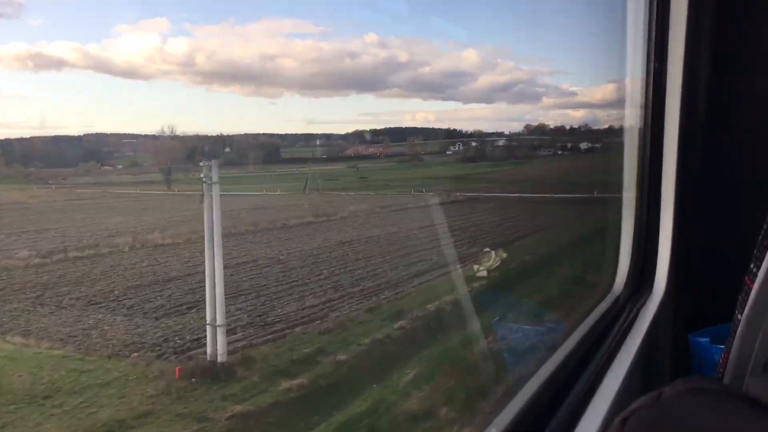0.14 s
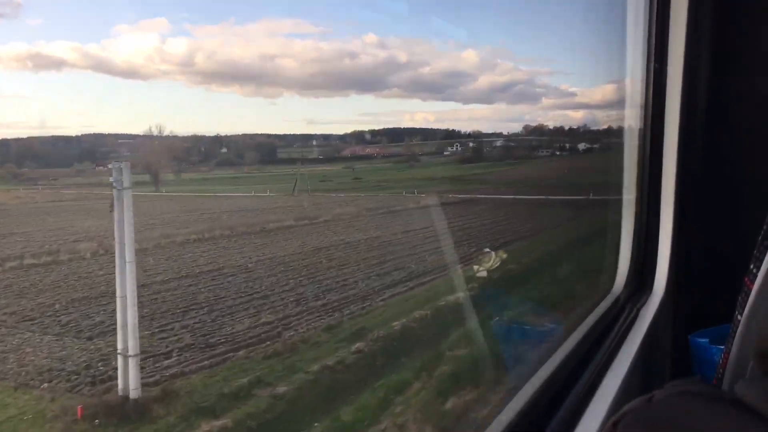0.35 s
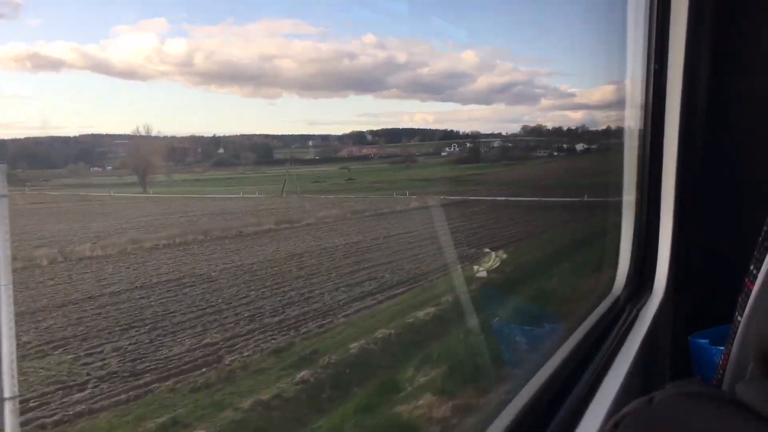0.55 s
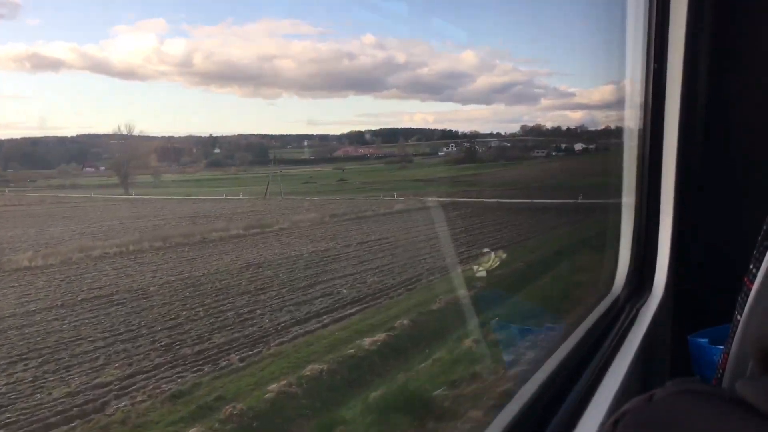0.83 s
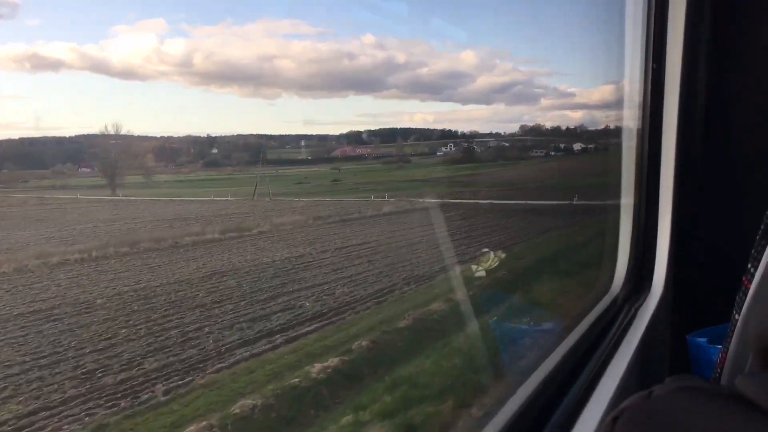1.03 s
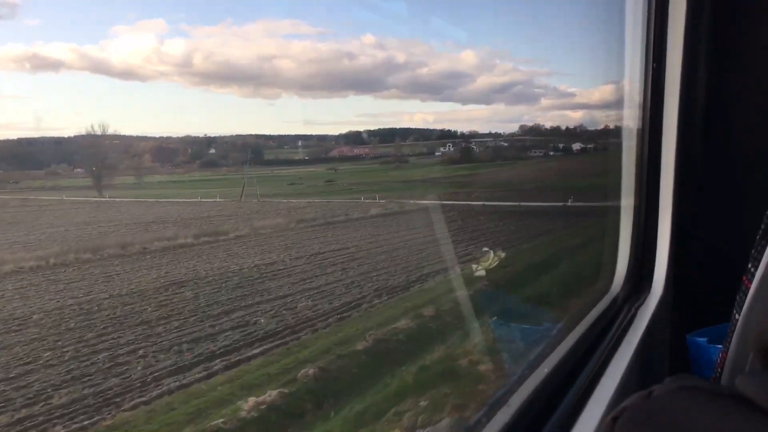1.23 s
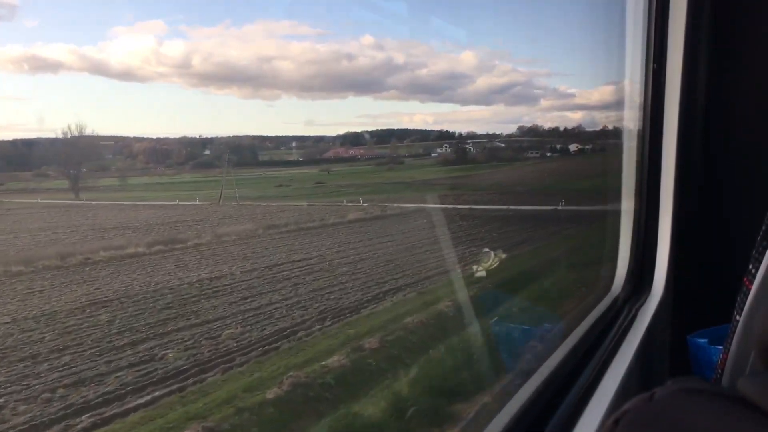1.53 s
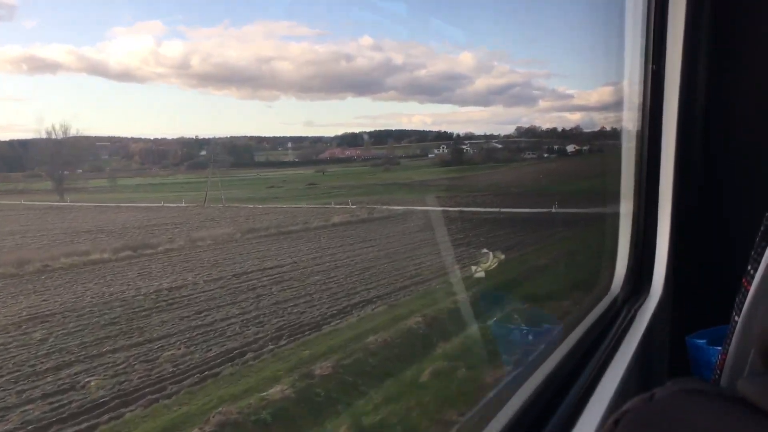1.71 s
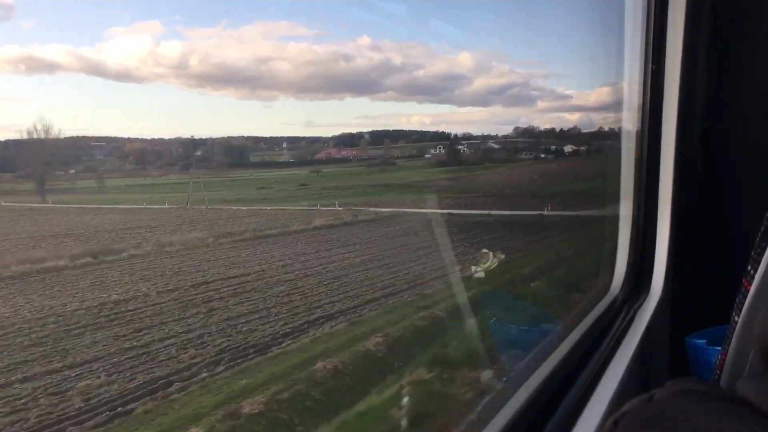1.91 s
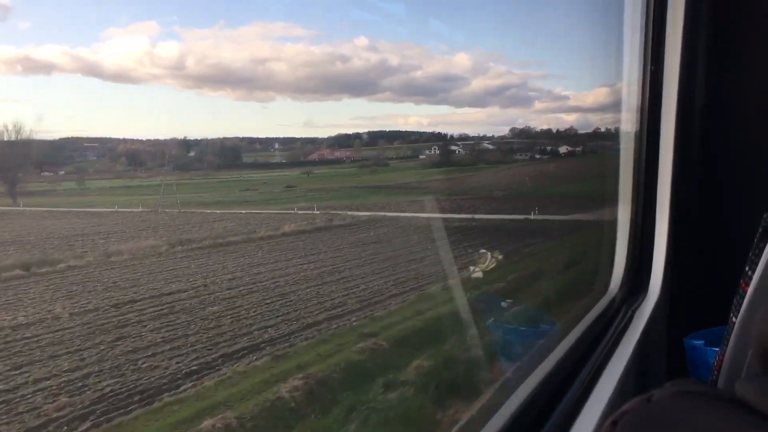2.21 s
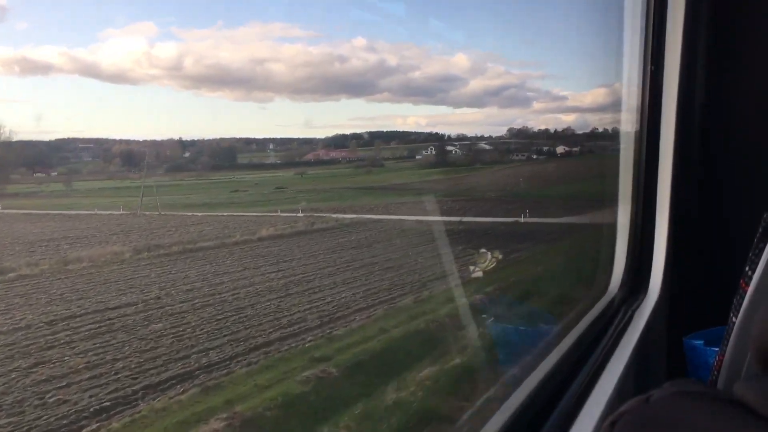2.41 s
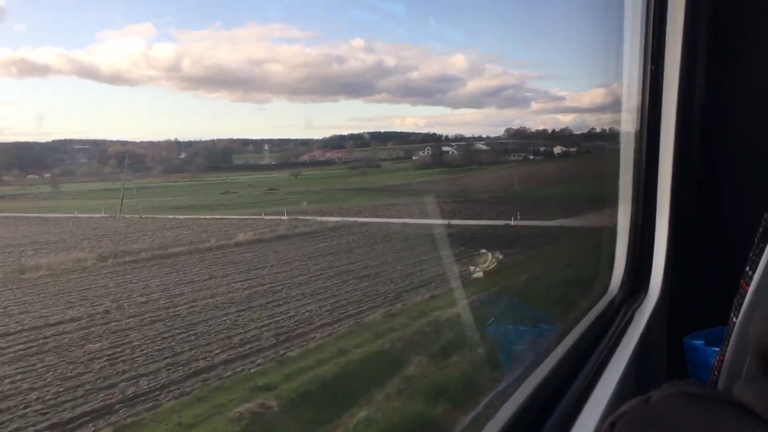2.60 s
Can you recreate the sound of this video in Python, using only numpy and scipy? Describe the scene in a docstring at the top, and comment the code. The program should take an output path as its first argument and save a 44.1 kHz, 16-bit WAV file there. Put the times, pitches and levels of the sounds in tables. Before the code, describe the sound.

Inside a railcar at constant speed, deep engine hum and wheel rumble fill the cabin throughout; quiet chugging, thin whines and airy hiss sit behind, with occasional tiny rattling ticks. Microphone at the seat, mono.

```python
"""Inside a diesel railcar running at speed.
From the start the underfloor engine, a sum of crankshaft orders and gated noise, drones and chugs.
Its pitch creeps up throughout, and it beats against the steady harmonics of the drive line.
Beneath lies wheel rumble, with a slowly rising hiss of air, both coloured noise, and thin narrow-band whines.
From a third of a second on, a loose fitting ticks now and then: short decaying bursts of noise."""
import sys
import numpy as np
from scipy.fft import rfft, irfft, next_fast_len
from scipy.io import wavfile
from scipy.ndimage import map_coordinates

SR = 44100
rng = np.random.default_rng(int(sys.argv[2]) if len(sys.argv) > 2 else 0)


def unload_wav(signal):
    """Save mono or channel-first audio to the path in sys.argv[1] as 16-bit WAV at rate SR, clipped to [-1, 1]."""
    wavfile.write(
        sys.argv[1],
        SR,
        np.round(np.clip(np.atleast_2d(signal).T, -1, 1) * 32767).astype(np.int16),
    )


N = 121275

# Crankshaft speed. Each row: time in seconds, speed in turns per second.
CRANK_SPEED = [(0, 30.05), (.6, 30.14), (1.4, 30.19), (1.9, 30.25), (2.75, 30.29)]
# Engine drone; orders change in level as they pass by a cabin resonance.
# Each row: multiple of the crank speed, level in dB at mid-scene, swell in dB per second.
DRONE_ORDERS = [(2, -19.5, 0), (4, -26, -0.27), (6, -52, -1), (7, -45, 1.5), (8, -47, 3.5),
                (10, -41.5, 2.2), (12, -50, 0)]
# Exhaust rasp. Each row: multiple of the crank speed, level in dB at mid-scene, swell in dB per second.
RASP_ORDERS = [(16, -64, -2.5), (18, -70, 0), (20, -54.5, 0), (22, -58.3, -1.6), (24, -65.5, -2),
               (26, -65, 1), (28, -69, 0), (30, -61, 1), (34, -64.5, 0), (38, -65.5, 0), (52, -64, -1.5),
               (56, -72, 0)]
# Drive line hum. Each row: multiple of the shaft speed, level in dB.
SHAFT_ORDERS = [(1, -50), (2, -31.5), (3, -24)]
# Gear and auxiliary whines. Each row: centre in Hz, level in dB, approximate width in Hz.
WHINES = [(290, -55, 3), (312.3, -50.5, .8), (346.5, -55, 1.5), (2562, -68, 8), (5448, -75, 14),
          (7930, -72.5, 170), (8230, -77.5, 60), (10880, -77.5, 12), (11120, -83, 40), (12280, -82, 90)]
# Spectra of the firing puffs, valve clatter, wheel rumble and air rush.
# Each row: frequency in Hz, relative density in dB per Hz.
CHUG_SPECTRUM = [(60, -57), (200, -19), (380, -3), (580, -1), (750, -7), (1000, -9.5), (1600, -20.5),
                 (4000, -50), (9000, -120)]
CLATTER_SPECTRUM = [(100, -60), (400, -24), (900, -1.5), (1500, -4), (2600, -8), (5000, -16.5),
                    (10000, -27), (16000, -120)]
RUMBLE_SPECTRUM = [(10, -45), (24, -30), (32, -9), (42, -4.5), (78, -0.5), (105, -6), (140, -8.5),
                   (180, -14.5), (220, -20), (275, -24.5), (335, -26.5), (450, -46.5), (900, -62),
                   (2000, -120)]
AIR_SPECTRUM = [(200, 8), (500, -2.5), (950, 4), (1300, -2.5), (1600, -2.5), (1950, -5), (2550, 0.5),
                (3200, -3.5), (4000, -9.5), (4900, -13.5), (5400, -9), (6200, -12.5), (7300, -14.5),
                (9200, -13.5), (10400, -18.5), (11200, -15.5), (13400, -16.5), (15700, -26)]
# Ticks of the loose fitting.
# Each row: start in seconds, low ring in dB, bright edge in dB, time to decay by 60 dB in seconds.
TICKS = [(.322, -57, -57, .1), (.788, -40.5, -50.5, .065), (1.367, -54, -48, .05), (1.465, -62, -43, .06),
         (1.748, -53, -56, .16), (2.285, -57, -53, .06), (2.468, -60, -56, .14)]
# Spectra of the ring and the edge. Each row: frequency in Hz, relative density in dB per Hz.
TICK_RING_SPECTRUM = [(200, -60), (900, -20), (1700, -12), (2400, -1), (3700, 0), (5500, -4), (8000, -14),
                      (15000, -27)]
TICK_EDGE_SPECTRUM = [(3000, -28), (6000, -6), (9000, -3), (11000, -3), (13500, 0), (15700, -7)]

FIRINGS_PER_TURN, CLATTER_PER_TURN = 2, 8
CHUG_SHARPNESS, CLATTER_SHARPNESS = 2.5, 1.64  # decay constants per cycle
SHAFT_HZ = 33.5
RUMBLE_DB, AIR_DB, CHUG_DB, CLATTER_DB = -26.5, -48.5, -52, -54
DRONE_WAVER_DB, RASP_WAVER_DB = .25, 1
DRONE_JITTER, RASP_JITTER = .025, .12  # radians
# Radians of phase scatter; each rasp order reaches the seat by its own path through the body
DRONE_SCATTER, SHAFT_SCATTER, PATH_SCATTER = .45, .5, .97
RUMBLE_SWAY_DB, AIR_SWAY_DB, AIR_RISE_DB_PER_S = .6, .35, .28
RIPPLE_DB, RIPPLE_HZ = 2.5, 21.98  # depth and spacing of the cabin's many small resonances
TICK_ATTACK_S = 0.0025
TOP_HZ = 15720


def amp(db):
    """Level: 20 dB is a tenfold gain in amplitude."""
    return 10 ** (np.asarray(db) / 20)


def unit(x):
    """Normalisation: a signal is divided by its rms."""
    return x / np.sqrt(np.mean(x ** 2) + 1e-20)


def seconds():
    """Sampling: the time of every sample in seconds."""
    return np.arange(N) / SR


def wobble(rate):
    """Random modulation: a smooth curve through random knots, rate knots a second."""
    return map_coordinates(rng.standard_normal(4096), [seconds() * rate + 2], mode="wrap")


def filtered(x, response):
    """Linear filtering: the spectrum is multiplied by a response of frequency."""
    m = next_fast_len(N + SR // 2)
    hz = np.fft.rfftfreq(m, 1 / SR)
    return irfft(rfft(x, m) * response(hz), m)[:N]


def noise(spectrum):
    """Spectral shaping: white noise takes the given colour, interpolated over log frequency, at rms 1."""
    f, db = np.transpose(spectrum)
    m = next_fast_len(N + 8192)
    hz = np.fft.rfftfreq(m, 1 / SR)
    gain = amp(np.interp(np.log(hz + 1), np.log(f), db))
    white = rng.standard_normal(m)
    return unit(irfft(rfft(white) * gain, m)[:N])


def partial(turns, order, jitter, waver_db, scatter):
    """Harmonic of a rotation: a sine of rms near 1, a little unsteady in level and phase."""
    phase = scatter * rng.standard_normal() + jitter * wobble(8.8)
    sine = np.sin(2 * np.pi * order * turns + phase)
    return np.sqrt(2) * sine * amp(waver_db * wobble(5.9))


def puffs(cycles, sharpness, rise=0.11):
    """Periodic gating: an rms 1 envelope opens quickly once a cycle and dies away exponentially."""
    age = cycles % 1
    return unit((1 - np.exp(-age / rise)) * np.exp(-sharpness * age))


def crank_orders(turns, orders, jitter, waver_db, scatter):
    """Order superposition: harmonics of the crank rotation add, each swelling or fading about mid-scene."""
    t = seconds()
    total = np.zeros(N)
    for order, db, swell in orders:
        level = amp(db + swell * (t - t.mean()))
        total += level * partial(turns, order, jitter, waver_db, scatter)
    return total


def engine():
    """Cyclic excitation: the crank sets clean low orders, exhaust rasp, firing puffs and valve clatter."""
    crank_speed = np.interp(seconds(), *np.transpose(CRANK_SPEED))
    turns = np.cumsum(crank_speed) / SR
    drone = crank_orders(turns, DRONE_ORDERS, DRONE_JITTER, DRONE_WAVER_DB, DRONE_SCATTER)
    rasp = crank_orders(turns, RASP_ORDERS, RASP_JITTER, RASP_WAVER_DB, PATH_SCATTER)
    chug = puffs(FIRINGS_PER_TURN * turns, CHUG_SHARPNESS) * noise(CHUG_SPECTRUM)
    clatter = puffs(CLATTER_PER_TURN * turns, CLATTER_SHARPNESS) * noise(CLATTER_SPECTRUM)
    return drone + rasp + amp(CHUG_DB) * chug + amp(CLATTER_DB) * clatter


def whine(hz, width):
    """Narrow-band noise: a carrier of rms 1 is blurred by a slow random complex envelope."""
    envelope = wobble(width) + 1j * wobble(width)
    return unit((envelope * np.exp(2j * np.pi * hz * seconds())).real)


def drive_line():
    """Rotational harmonics: the shaft hums at its own speed; gears and auxiliaries add fuzzy whines."""
    turns = SHAFT_HZ * seconds()
    total = np.zeros(N)
    for order, db in SHAFT_ORDERS:
        total += amp(db) * partial(turns, order, DRONE_JITTER, DRONE_WAVER_DB, SHAFT_SCATTER)
    for hz, db, width in WHINES:
        total += amp(db) * whine(hz, width)
    return total


def rolling():
    """Broadband excitation: wheels rumble through the floor and air rushes along the car."""
    t = seconds()
    rumble_db = RUMBLE_DB + RUMBLE_SWAY_DB * wobble(5.13)
    air_db = AIR_DB + AIR_SWAY_DB * wobble(7.94) + AIR_RISE_DB_PER_S * (t - t.mean())
    rumble = amp(rumble_db) * noise(RUMBLE_SPECTRUM)
    air = amp(air_db) * cabin(noise(AIR_SPECTRUM))
    return rumble + air


def cabin(x):
    """Room resonance: the cabin lays a fixed, irregular ripple on the spectrum of the airborne sound."""
    knots = rng.standard_normal(8192)

    def ripple(hz):
        """Frequency response: a smooth random gain, one knot every RIPPLE_HZ."""
        return amp(RIPPLE_DB * map_coordinates(knots, [hz / RIPPLE_HZ], mode="wrap"))

    return unit(filtered(x, ripple))


def fitting():
    """Impulsive excitation: loose trim ticks faintly, a low ring and a bright edge decaying together."""
    ring, edge = noise(TICK_RING_SPECTRUM), noise(TICK_EDGE_SPECTRUM)
    total = np.zeros(N)
    for start, ring_db, edge_db, t60 in TICKS:
        age = np.maximum(seconds() - start, 0)
        attack = np.minimum(age / TICK_ATTACK_S, 1)
        decay = amp(-60 * age / t60)
        total += attack * decay * (amp(ring_db) * ring + amp(edge_db) * edge)
    return total


def scene():
    """Superposition: the pressures of all sources add at the seat, in one channel."""
    mix = engine() + drive_line() + rolling() + fitting()
    return mix[None]


def record(dry):
    """Band limiting: a steep low-pass removes everything from TOP_HZ up."""
    return np.array([filtered(x, lambda hz: hz < TOP_HZ) for x in dry])


dry = scene()
out = record(dry)
unload_wav(out)
```